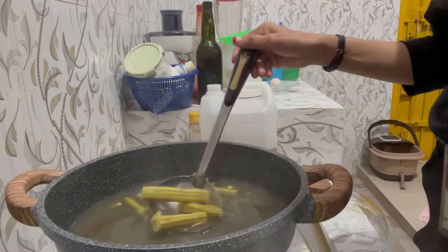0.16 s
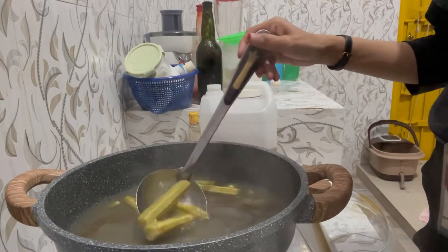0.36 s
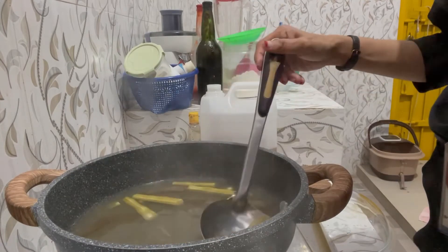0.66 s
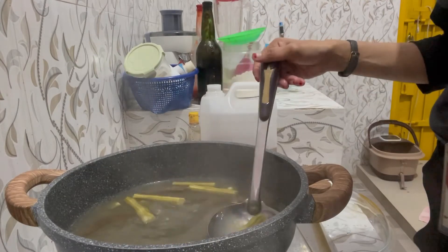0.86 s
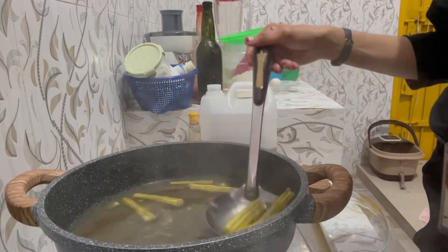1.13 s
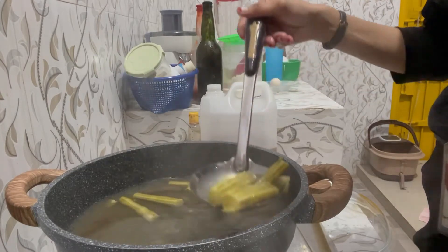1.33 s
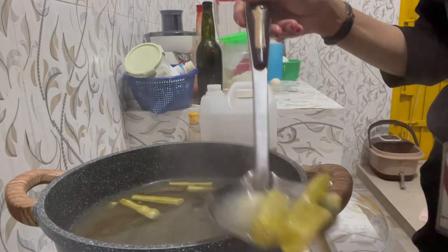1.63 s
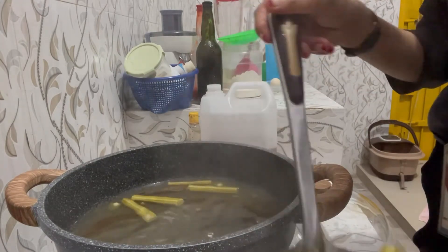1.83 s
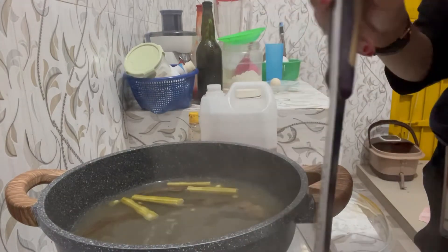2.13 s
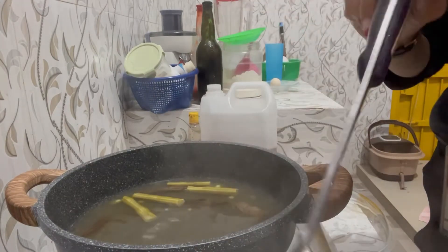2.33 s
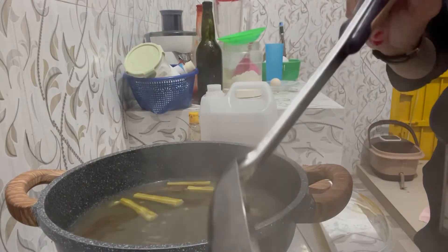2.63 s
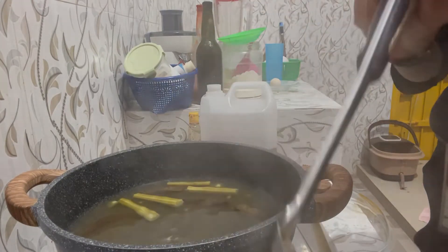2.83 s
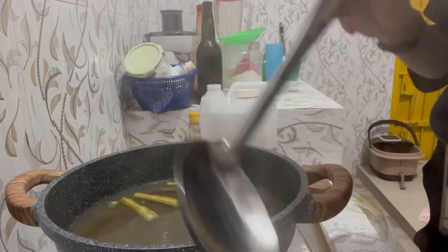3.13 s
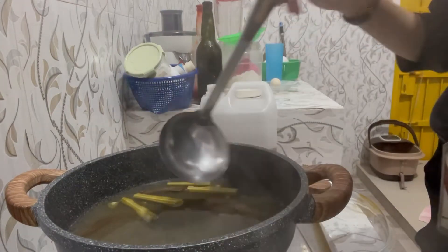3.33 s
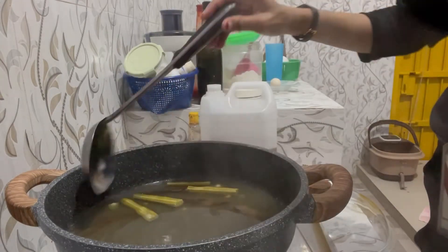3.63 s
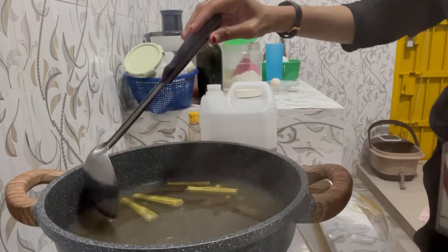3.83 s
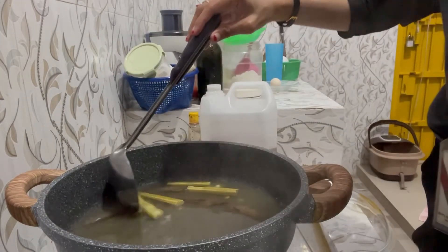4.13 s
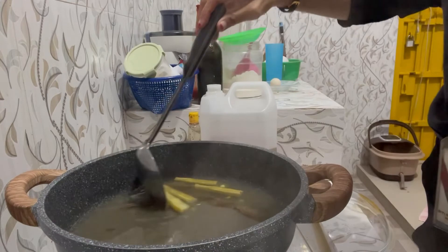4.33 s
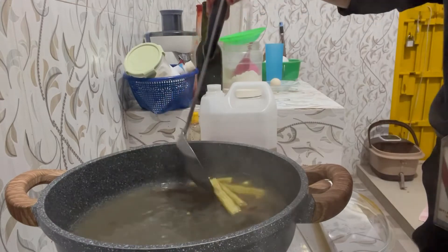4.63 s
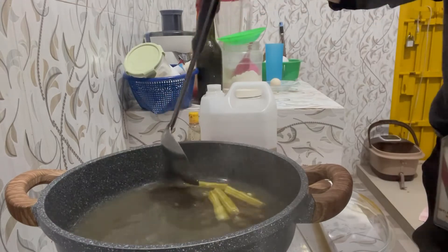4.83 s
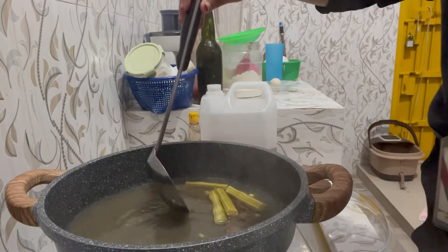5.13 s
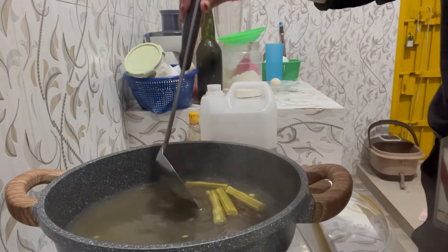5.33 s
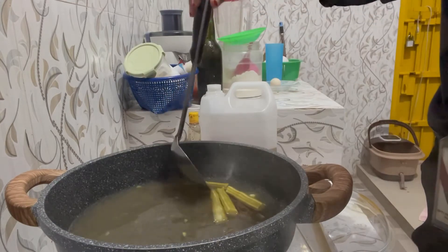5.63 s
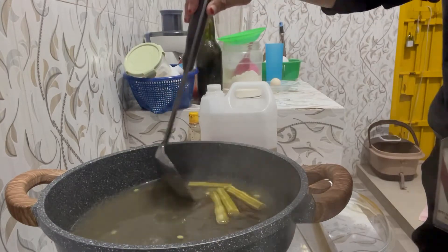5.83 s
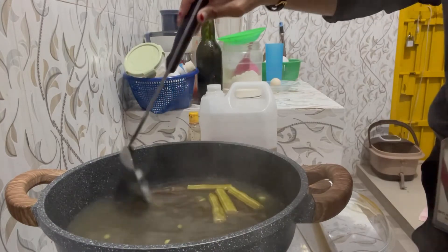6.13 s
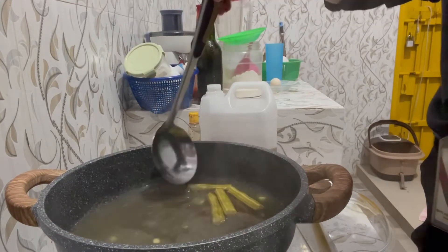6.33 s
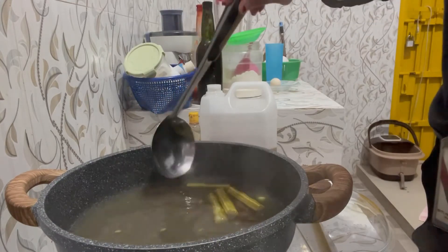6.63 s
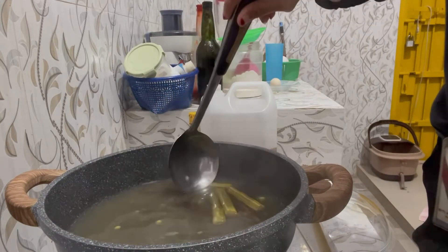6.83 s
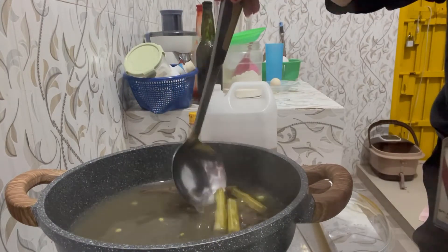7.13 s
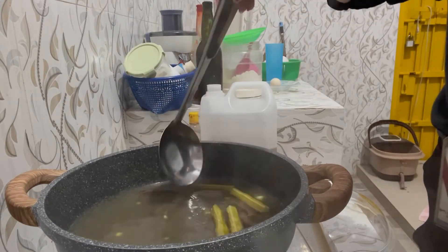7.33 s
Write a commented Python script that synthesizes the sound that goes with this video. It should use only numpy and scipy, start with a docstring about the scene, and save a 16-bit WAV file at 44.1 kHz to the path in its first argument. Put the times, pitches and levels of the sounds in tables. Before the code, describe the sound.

A steel ladle strikes a soup pot at 0.1 and 0.6 seconds, ringing briefly, with light scraping and soft plops. Throughout, a distant one-cylinder motorbike thumps low through the walls over road roar and hiss. A very faint whine rises and falls around 1.5 seconds. From 2 to 2.6 seconds, bits of food tick lightly into a bowl, and a small plop follows near 2.9. The ladle clinks and scrapes again between 3.6 and 4.7 seconds and knocks the pot at 5.2. The bike draws nearer, drops its revs for a gear change at 5.25 seconds, then pulls on, strongest around 7. From 6 to 7 seconds the ladle clatters hardest, with sharp, bright hits, short scrapes and a couple of plops. The kitchen is small, with little echo; the ladle is close, heard in stereo by two spaced microphones.

```python
"""A steel ladle taps and scrapes a soup pot in a small kitchen and the soup plops, while the exhaust
of a distant one-cylinder motorbike thumps through the walls over road roar and hiss. A faint whine
passes at 1.5 s, then bits of food tick into a bowl. The bike draws nearer, changes gear at 5.25 s
and pulls on, and from 6 s the ladle clatters hardest, each blow ringing the steel and the pot.
Two spaced microphones hear it all: bass alike on both, treble unrelated."""
import sys
import numpy as np
from scipy import signal
from scipy.io import wavfile
from scipy.ndimage import uniform_filter1d

SR = 44100
rng = np.random.default_rng(int(sys.argv[2]) if len(sys.argv) > 2 else 0)


def generate_wav(signal):
    """Clip the signal to [-1, 1] and save it as 16-bit WAV at the path in sys.argv[1]."""
    frames = np.transpose(np.atleast_2d(signal))
    scaled = np.clip(frames, -1, 1) * 32767
    pcm = np.round(scaled).astype(np.int16)
    wavfile.write(sys.argv[1], SR, pcm)


N = 329427

# Ladle hits on the pot. Each row: start in seconds, ring level in dB, favoured pitch in Hz, fall-off
# in dB per octave, two pitches that sing out in Hz, ring time as a multiple of the free ring, crack
# and pot hum in dB against the ring, delay at the right microphone in ms.
LADLE_TAPS = [(0.1025, -25.5, 2070, 8.4, 2800, 3820, 1, -1, -2.5, 0.26),
              (0.572, -41.5, 2100, 11, 2080, 2080, 0.74, 4, -6, -0.57),
              (.606, -27, 2980, 2.8, 7900, 1240, .6, -1.5, -12, 0.28),
              (.641, -42, 5200, 17, 5100, 5100, 0.92, -14, -21, 0.37),
              (0.821, -46, 5200, 7, 5960, 5960, 0.66, -2, -15, .3),
              (2, -42.5, 5650, 29, 5650, 5650, 1, -12, -40, .3),
              (3.646, -44.5, 2040, 14, 2400, 2400, 1, 2, -29, 0.35),
              (3.912, -35, 2000, 5, 2800, 2800, 1.1, -1, -29, -0.63),
              (4.221, -33.5, 5900, 10, 1240, 1240, 1.3, -20, -32, .3),
              (4.24, -47, 5900, 9, 5960, 5960, 0.91, -11, -23, 0.32),
              (4.3892, -31, 1350, 20, 1240, 1320, 1.2, -5, -28, -0.66),
              (4.3977, -30, 1350, 18, 1240, 1500, 1, -1, -25, -0.53),
              (4.42, -32, 1700, 14, 1860, 1500, 1.1, -12, -31, -.6),
              (5.211, -26.5, 2060, 9.7, 1320, 2790, 1.5, -11.5, -4, -0.56),
              (5.998, -13.5, 6000, 1.7, 5960, 6420, 0.81, -18, -25, .32),
              (6.002, -17, 4400, 10, 4260, 1320, 1.4, -26, -21, .32),
              (6.294, -13.5, 6440, 1.5, 5650, 5120, 0.63, -20, -34, -0.0036),
              (6.318, -21.5, 3000, 2.3, 5650, 4240, 0.78, -13, -14, -0.011),
              (6.424, -30, 3500, 2.4, 5100, 2400, 0.79, -6, -6.5, -0.077),
              (6.6936, -38, 3800, 12, 3820, 3820, 0.96, -10, -19, -0.07),
              (6.7182, -29, 4500, 3.3, 5650, 2400, 0.88, -9, -22, -0.07),
              (6.7265, -27, 2200, 3.2, 2080, 3220, 1.2, -13, -22, -0.07),
              (6.734, -28, 4500, 8, 5960, 3220, 1.9, -14, -27, -.07),
              (6.759, -36, 2600, 10, 2400, 3220, 1.7, -14, -25, -.07),
              (6.824, -27.5, 6800, 4.5, 4460, 6420, 0.62, -6, -27, -0.053),
              (6.953, -22, 1600, 2.4, 1240, 11580, 0.85, 0.5, -29, 0.14)]
# The voices of ladle and pot. Each row: mode pitch in Hz, level in dB, seconds to fade by 60 dB.
LADLE_MODES = [(1240, -2, .035), (1320, -6, .04), (1500, -3, .035), (1860, -3, .035), (2080, -2, .035),
               (2430, -4, .03), (2790, -8, .025), (3200, -8, .03), (3820, -4, .025), (4260, -6, .04),
               (4460, -7, .035), (5120, -4, .02), (5650, -5, .02), (5960, -5, .045), (6420, -4, .022),
               (7250, -8, .018), (8050, -8, .018), (8550, -11, .015), (10700, -10, .02), (11580, -7, .025),
               (13500, -12, .012), (15300, -13, .02)]
POT_MODES = [(260, -4, .2), (405, -1, .18), (610, -11, .1), (805, -3.5, .28), (880, -8, .25), (950, -9, .1),
             (1100, -9, .06), (1220, -8, .1), (1400, -6, .06), (1860, -15, .12)]
# Drags of the ladle's edge. Each row: start and length in seconds, level in dB, favoured pitch in Hz,
# fall-off in dB per octave, pitch that sings out in Hz, slips per second, treble rasp in dB against
# the ring, delay at the right microphone in ms.
LADLE_SCRAPES = [(0.354, 0.28, -64.5, 4000, -1, 5960, 3400, -24, 0.35),
                 (0.502, 0.16, -53.5, 2180, 1, 1900, 2100, -18, 0.14),
                 (0.654, 0.13, -63, 2000, 7, 2080, 2500, -23, .3),
                 (4.376, 0.08, -39.5, 1430, 6.5, 1860, 1700, -15.5, -0.61),
                 (4.499, 0.21, -51.5, 1700, 26, 1500, 1450, -23, -0.47),
                 (6.014, 0.069, -57, 5000, 16, 5960, 2400, -22, 0.28),
                 (6.324, 0.077, -52, 4630, 0, 5960, 2100, -18, -.04),
                 (6.638, 0.026, -52.5, 5800, 19, 5960, 2100, -15, -0.067),
                 (6.709, 0.067, -42.5, 2600, -2.5, 2380, 1070, -26, -0.073)]
# Soft hits on the soup. Each row: start in seconds, level in dB, pitch in Hz, seconds to fade by 60 dB.
SOUP_PLOPS = [(0.608, -26, 230, 0.13), (.62, -41, 293, 0.74), (0.636, -36, 388, 0.22),
              (0.702, -42, 332.5, 0.53), (2.901, -43, 271, 0.29), (6.005, -34.5, 261.5, 0.97),
              (6.302, -43, 259, 0.4)]
# Food and drops landing in the bowl. Each row: start in seconds, level in dB, centre pitch in Hz.
FOOD_TICKS = [(.0095, -38, 8000), (1.079, -48, 3830), (1.962, -45, 8000), (2.032, -44.5, 9000),
              (2.04, -49, 4350), (2.074, -35, 10700), (2.137, -45, 3660), (2.177, -37.5, 6500),
              (2.325, -42.5, 6470), (2.331, -56, 11000), (2.356, -49, 11000), (2.371, -46, 1500),
              (2.5476, -46, 3800), (2.579, -54, 6460), (2.6194, -59, 3500), (3.3844, -47, 3670),
              (4.44, -40, 13000)]
# The engine's revs. Each row: time in seconds, firings per second.
FIRING_RATE = [(0, 22.2), (.62, 23.4), (1.14, 24.2), (2.25, 25.35), (3.22, 25.8), (4, 26.1), (4.49, 26.3),
               (4.89, 26.1), (5.26, 26.15), (5.4, 21.3), (5.5, 21.7), (5.8, 23.75), (5.95, 24.2),
               (6.55, 24.27), (6.95, 24.2), (7.26, 24.07), (7.47, 23.6)]
# The body of the exhaust. Each row: time in seconds, level in dB, pitch the path favours in Hz.
THUMP = [(0, -38.5, 138), (.25, -30, 108), (.56, -36.5, 181), (1.12, -38, 147), (1.5, -39.5, 134),
         (1.85, -31.5, 129.4), (2.43, -28, 119.5), (2.62, -31, 123), (2.85, -29, 125), (3.15, -31.5, 129),
         (3.4, -28.5, 136.5), (3.74, -31, 144), (3.93, -35.5, 132), (4.25, -26.5, 152),
         (4.49, -30.5, 165.6), (4.68, -27.5, 151), (5.1, -26, 179.5), (5.26, -27, 158), (5.36, -32.5, 121),
         (5.61, -27.5, 171.4), (5.82, -29.5, 134), (6.05, -30, 155), (6.4, -24.5, 168), (6.75, -25, 165.6),
         (7.1, -21.5, 134), (7.47, -29.5, 150)]
# The bike's approach. Each row: time in seconds, level in dB against roughly its nearest point.
NEARNESS = [(0, -12), (1.2, -12.5), (2.6, -11.5), (3.33, -8.5), (4.2, -6), (4.6, -5.5), (5.1, -3.5),
            (5.26, -7.5), (5.49, -9.5), (5.65, -5.5), (6.14, -2.5), (6.7, 0.5), (6.95, -1), (7.32, -1.5),
            (7.47, -5)]
# Two paths cancel at a pitch that sweeps as the bike moves. Each row: time in seconds, notch pitch
# in Hz, gain there in dB (a lift if positive), half width of the thump's favoured band in Hz.
PATH_NOTCH = [(0, 140, 0, 32), (1.5, 141, 1.5, 31), (2.3, 166, -4, 26.8), (2.58, 157, -13, 30),
              (2.72, 130, -9, 41.4), (3.12, 139.3, -28, 41.4), (3.3, 106.5, -16, 36), (3.6, 120, -13.5, 29),
              (3.9, 146, -9, 39.8), (4.0, 150, 3, 40), (4.08, 124, -15, 42.5), (4.36, 144, -13, 47.7),
              (4.42, 111, 2, 45), (4.5, 104, -21, 39.5), (4.8, 143, -44, 43.6), (4.95, 151, -46, 33.6),
              (5.04, 152, -6, 39.3), (5.12, 128, 7.5, 38.4), (5.3, 136, 4.5, 35.5), (5.55, 156, -8, 45),
              (5.7, 156, -2, 44.7), (5.86, 141, -40, 39.5), (6.02, 146, -25, 45.5), (6.15, 112, -11, 40.7),
              (6.5, 113, -4, 38), (6.62, 142, -7, 39.5), (6.76, 193, -17, 41.3), (6.92, 183, -35, 33.5),
              (7.05, 195, 7, 31.3), (7.47, 194, -0.5, 32.3)]
# EQ for the exhaust's deep and rasping harmonics. Each row: frequency in Hz, gain in dB.
DEEP_AND_RASP_EQ = [(20, -29), (48, 2.5), (75, -11.5), (245, -7.5), (305, -10), (410, -4.5), (465, -19),
                    (497, -11), (525, -19.5), (560, 4.5)]
# A moving accent in the exhaust's rasp. Each row: time in seconds, pitch in Hz, lift in dB.
RASP_ACCENT = [(0, 395, -1), (2.1, 434, 3.5), (2.3, 312, 7.5), (3.2, 302, 16.5), (3.5, 306, 1.5),
               (3.75, 308, 16), (4.05, 317, 5), (4.3, 400, -19), (4.7, 412, 7.5), (5.3, 406, 2.5),
               (5.75, 397, 6), (6.0, 398, 11), (6.35, 383, 12), (6.6, 415, 14.5), (6.84, 392, -5.5),
               (6.94, 380, 15), (7.04, 378, 14.5), (7.11, 375, -2), (7.2, 368, 8), (7.47, 369.6, 18.5)]
# The tone of the road roar and of the hiss. Each row: frequency in Hz, gain in dB.
ROAR_EQ = [(28, -47), (50, 28), (110, 18.5), (200, 7.5), (260, 6.5), (420, 7.5), (650, 2.5), (930, 1.5),
           (1250, -3), (1520, -9), (1800, -6.5), (2300, -12), (3000, -14), (3900, -15.5), (5000, -23.5),
           (9000, -48)]
HISS_EQ = [(1000, -10), (3000, -3), (6000, 8.5), (8000, 3.5), (9300, -10.5), (11000, 3), (13000, -5.5),
           (13700, -9), (16000, -55)]
# Resonances that colour the roar indoors. Each row: centre in Hz, half width in Hz, mean lift in dB.
INDOOR_RESONANCES = [(912, 52, 8), (1533, 91, 7.5), (1956, 13, -2), (2246, 225, 5), (3830, 150, 4)]
# The hiss jumps up and dies away. Each row: start in seconds, rise in dB.
HISS_SWELLS = [(.45, 6), (2.1, 5), (2.8, 8)]
# Stereo width of the street. Each row: frequency in Hz, left-right likeness from 0 to 1.
STEREO_LIKENESS = [(60, 0.97), (150, 1), (290, 0.076), (600, 0.0093), (3000, 0.017), (15000, 0.012)]
# Panning of the street. Each row: frequency in Hz, left minus right in dB.
STEREO_BALANCE = [(60, -1.5), (180, 3), (550, -2.5), (1650, 0.5), (4970, 0.5), (15000, 0)]
# The whine's rise and fall. Each row: time in seconds, pitch in Hz, level in dB.
WHINE_PATH = [(1.33, 950, -75), (1.42, 965, -55), (1.55, 1015, -54), (1.68, 1035, -58), (1.8, 985, -62),
              (1.95, 950, -62), (2.05, 940, -75)]
# The kitchen's reverb. Each row: frequency in Hz, seconds to fade by 60 dB.
KITCHEN_DECAY = [(250, 0.036), (1500, 0.13), (6000, 0.096), (14000, 0.0034)]

SING_DB, TWIN_SHARE, TWIN_DB = 2, .01, -10  # ladle modes: those that sing out; each one's weaker twin
BOWL_DELAY_MS = .3
ROAR_DB, HISS_DB, DEEP_DB, RASP_DB = -53.5, -80, -37.5, -45.5  # faders ahead of EQ and nearness
DEEP_FOLLOWS, RASP_FOLLOWS = .68, .7  # dB per dB of nearness
# Gear change: the throttle shuts, firing turns uneven, and the deepest harmonics stay away a while.
SHIFT_S, SHUT_S, UNEVEN_S, DEEP_GONE_S, RECOVER_S, DEEP_LOSS_DB = 5.25, .07, .43, 1.0, .2, -25
ROUGH_FAR, ROUGH_PULL, ROUGH_SHIFT, SETTLED_S = .06, .02, .28, 1.6  # roughness runs from 0 to 1
FAR_DB, NEAR_DB, SLIP_FAR, SLIP_NEAR = -5.5, -3, 1.4, .5  # phase steadies as the direct path takes over
WALL_HZ, NOTCH_HALF_WIDTH_HZ, ACCENT_HALF_WIDTH_HZ = 227.2, 9.9, 24


def ladle_taps():
    """Steel strikes the pot: a short crack, the ladle's ring and the soup-damped hum of the pot."""
    out, t = np.zeros((2, N)), np.arange(SR // 3) / SR
    for start, db, hz, fall_db, sing_hz, also_hz, lasting, crack_db, pot_db, delay_ms in LADLE_TAPS:
        contact = 1 - np.exp(-t / .0009)  # the curved edge beds in over a millisecond or two
        metal = ladle_ring(hz, fall_db, (sing_hz, also_hz), lasting, t) * contact
        noise = rng.standard_normal(len(t))
        crack = unit_rms(steep_band(noise, hz, 1.4 * hz)) + gain_of(-2.5 * max(fall_db, 0)) * noise
        crack *= gain_of(-60 * t / .016) * contact
        hum = ring(POT_MODES, t, spread_db=1.5, detune=.006) * (1 - np.exp(-t / .006))
        hit = metal / abs(metal).max() + gain_of(crack_db) * crack + gain_of(pot_db) * hum
        place(out, start, gain_of(db) * hit, delay_ms)
    return out


def ladle_scrapes():
    """Uneven slips of the dragging edge keep the ladle ringing, with grit and a bright rasp on top."""
    out, ring_t = np.zeros((2, N)), np.arange(1500) / SR
    for start, length, db, hz, fall_db, sing_hz, per_s, treble_db, delay_ms in LADLE_SCRAPES:
        t = np.arange(int(length * SR)) / SR
        chance, size, sign = rng.random((3, SR // 2))[:, :len(t)]
        noise = size - .5
        slips = (chance < per_s / SR) * gain_of(-3 * np.log(size + 1e-4)) * np.sign(sign - .5)
        slips += .1 * noise
        steel = ladle_ring(hz, fall_db, [sing_hz], lasting=.83, t=ring_t)
        metal = signal.fftconvolve(slips[None], steel, axes=1)[:, :len(t)]
        grit = per_s / 3500 * unit_rms(steep_band(slips, hz, hz))  # denser slips sound grittier
        rasp = gain_of(treble_db) * unit_rms(steep_band(noise, 11500, 4500))
        level = gain_of(db + 2.5 * drift(t, 70.)[0])
        ease = signal.windows.tukey(len(t), min(3 * length, 1))
        place(out, start, level * (unit_rms(metal) + grit + rasp) * ease, delay_ms)
    return out


def ladle_ring(hz, fall_db, sing_hz, lasting, t):
    """The steel rings around the pitch the contact favours, and the modes nearest sing_hz sing out."""
    singers = [min(LADLE_MODES, key=lambda mode: abs(mode[0] - pitch))[0] for pitch in sing_hz]
    modes = [(f, SING_DB if f in singers else db - fall_db * abs(np.log2(f / hz)), t60 * lasting)
             for f, db, t60 in LADLE_MODES]
    # The ladle's cup is not quite round, so each mode has a slightly sharp twin.
    modes += [(f * (1 + TWIN_SHARE), db + TWIN_DB, t60) for f, db, t60 in modes]
    sound = ring(modes, t, spread_db=1.3, detune=.003)
    return sound / abs(sound).max()


def ring(modes, t, spread_db, detune):
    """Dying modes in stereo; each blow lands elsewhere and wakes them unevenly and out of step."""
    out, sides = np.zeros((2, len(t))), np.array([[.5], [-.5]])
    for hz, db, t60 in modes:
        strength, tuning, offset, sideways = rng.standard_normal(4)
        phase = 2 * np.pi * hz * (1 + detune * tuning) * t + 2 * offset
        phase = phase + .7 * sideways * sides  # each mode radiates its own way
        out += gain_of(db + spread_db * strength - 60 * t / t60) * np.sin(phase)
    return out


def soup_plops():
    """Ladle or food thumps the soup: a low, soft-edged note whose pitch rises a little."""
    out, t = np.zeros((2, N)), np.arange(SR // 3) / SR
    for start, db, hz, t60 in SOUP_PLOPS:
        slosh = unit_rms(band(rng.standard_normal(len(t)), hz, .5 * hz))
        tone = np.sin(2 * np.pi * hz * (t + .11 * t ** 2))
        envelope = gain_of(db - 60 * t / t60) * (1 - np.exp(-t / .005))
        place(out, start, envelope * (tone + .57 * slosh), BOWL_DELAY_MS)
    return out


def food_ticks():
    """Bits of food and drops land in the bowl with tiny bright clicks."""
    out, t = np.zeros((2, N)), np.arange(600) / SR
    for start, db, hz in FOOD_TICKS:
        click = unit_rms(band(rng.standard_normal(len(t)), hz, .7 * hz))
        place(out, start, gain_of(db - 60 * t / .0054) * click, BOWL_DELAY_MS)
    return out


def kitchen_reverb(x):
    """Sparse wall reflections, different on each side, with every band dying at its own speed."""
    echoes = np.zeros((2, SR // 2))
    at = np.arange(60, SR // 2 - 20, 20)
    at = at + rng.integers(0, 20, (2, len(at)))
    np.put_along_axis(echoes, at, rng.choice([-1., 1.], at.shape), 1)
    hz, t, spectra = signal.stft(echoes, SR, nperseg=256)
    decay = gain_of(-60 * t / at_pitch(KITCHEN_DECAY, hz)[:, None])
    tail = signal.istft(spectra * decay, SR, nperseg=256)[1]
    return signal.fftconvolve(x[None], tail / np.linalg.norm(tail[0]), axes=1)[:, :N]


def motorbike_exhaust(count=21):
    """Harmonics of the firing rate, each fading and slipping in phase as its path to the room moves."""
    step = 16  # all low end, so it is built at a reduced sample rate
    t = np.arange(N // step + 2) * step / SR
    thump_db, favoured_hz = curves(THUMP, t)
    rate, near_db = curves(FIRING_RATE, t)[0], curves(NEARNESS, t)[0]
    firings = np.cumsum(rate * (1 + .002 * drift(t, 6.)[0])) * step / SR
    order = np.arange(1, count + 1)[:, None]
    hz = order * rate
    is_thump = (order > 3) & (order < 10)  # the deep end lies below, the rasp above
    outer_db = deep_and_rasp_db(t, order, hz, near_db) - thump_db
    shape = np.where(is_thump, path_through_walls(t, hz, favoured_hz), gain_of(outer_db))

    rough = ROUGH_PULL + (ROUGH_FAR - ROUGH_PULL) * (t < SETTLED_S)
    rough += (ROUGH_SHIFT - ROUGH_PULL) * gear_change(t, UNEVEN_S)
    fade, slip, apart, shake = (drift(t, top_hz, count) for top_hz in (2., .7, 1.2, 20.))
    loose = np.clip(hz / 300, .2, 1.1)  # short waves feel the path more
    size = shape * gain_of(np.where(is_thump, 1.2, 2 + loose) * fade)
    size /= np.where(is_thump, np.sqrt((size ** 2 * is_thump).sum(0)), 1)  # hold the thump's power
    size *= 1 + 1.5 * rough * shake

    slide = np.interp(near_db, [FAR_DB, NEAR_DB], [SLIP_FAR, SLIP_NEAR])
    wander = np.where(is_thump, slide, 1.5) * np.sqrt(loose) * slip + .6 * slip[0]
    jitter = (1 + 3 * loose) * rough * shake[::-1]
    phase = 2 * np.pi * order * firings + wander + jitter
    width = np.arccos(at_pitch(STEREO_LIKENESS, hz)) * apart / 2
    pan = gain_of(at_pitch(STEREO_BALANCE, hz) / 2)
    pair = np.array([(size * pan ** side * np.cos(phase + side * width)).sum(0) for side in (1, -1)])
    return signal.resample_poly(np.sqrt(2) * gain_of(thump_db) * pair, step, 1, axis=1)[:, :N]


def path_through_walls(t, hz, favoured_hz):
    """The thump's way indoors favours one pitch, notches another and loses its top to the walls."""
    notch_hz, notch_db, half_width = curves(PATH_NOTCH, t)
    favoured = bell(hz, favoured_hz, half_width) + .24
    notch = gain_of(notch_db * bell(hz, notch_hz, NOTCH_HALF_WIDTH_HZ))
    return favoured * notch / (1 + (hz / WALL_HZ) ** 36)


def deep_and_rasp_db(t, order, hz, near_db):
    """The exhaust's deep end and rasp grow as it nears; the deep end ducks at the gear change."""
    deep_db = DEEP_DB + DEEP_FOLLOWS * near_db + DEEP_LOSS_DB * gear_change(t, DEEP_GONE_S)
    accent_hz, lift_db = curves(RASP_ACCENT, t)
    rasp_db = RASP_DB + RASP_FOLLOWS * near_db + lift_db * bell(hz, accent_hz, ACCENT_HALF_WIDTH_HZ)
    return np.where(order < 4, deep_db, rasp_db) + at_pitch(DEEP_AND_RASP_EQ, hz)


def gear_change(t, hold_s):
    """An envelope that rises to 1 as the throttle shuts, holds and falls back."""
    return np.interp(t, np.cumsum([SHIFT_S, SHUT_S, hold_s, RECOVER_S]), [0, 1, 1, 0])


def road_noise():
    """A bed of road roar, puffing a little with each firing, and hiss; both grow as the bike nears."""
    hop = 256
    t, hz = np.arange(N // hop + 5) * hop / SR, np.fft.rfftfreq(1024, 1 / SR)[:, None]
    left_re, left_im, other_re, other_im, patches = rng.standard_normal((len(t), len(hz), 5)).T
    patches = unit_rms(uniform_filter1d(uniform_filter1d(patches, 8, 0), 16, 1))
    near_db = curves(NEARNESS, t)[0]
    swell_db = sum(db * (t > start) * np.exp(-abs(t - start) / .16) for start, db in HISS_SWELLS)
    hiss = gain_of(HISS_DB + at_pitch(HISS_EQ, hz) + near_db + swell_db)
    puff_db = .5 * np.cos(2 * np.pi * np.cumsum(curves(FIRING_RATE, t)[0]) * hop / SR)
    wavers = 1 + .22 * drift(t, 4., len(INDOOR_RESONANCES))
    indoor_db = sum(db * bell(hz, centre, half_width) * waver
                    for (centre, half_width, db), waver in zip(INDOOR_RESONANCES, wavers))
    roar = gain_of(ROAR_DB + at_pitch(ROAR_EQ, hz) + indoor_db + near_db + puff_db)
    likeness, pan = at_pitch(STEREO_LIKENESS, hz), gain_of(at_pitch(STEREO_BALANCE, hz) / 2)
    left = left_re + 1j * left_im
    right = likeness * left + np.sqrt(1 - likeness ** 2) * (other_re + 1j * other_im)
    spectra = np.array([left * pan, right / pan]) * np.hypot(roar, hiss) * gain_of(1.2 * patches)
    return signal.istft(spectra, nperseg=1024, noverlap=1024 - hop)[1][:, :N]


def faint_whine():
    """A thin, slightly unsteady tone that rises and falls."""
    hz, db = curves(WHINE_PATH, np.arange(N) / SR)
    wobble = unit_rms(uniform_filter1d(uniform_filter1d(rng.standard_normal((2, N)), 500), 500))
    tone = np.sqrt(2) * np.cos(2 * np.pi * np.cumsum(hz) / SR + wobble[::-1])
    return gain_of(db + 2 * wobble) * tone * (db > -75)


def place(pair, start, sound, delay_ms):
    """Close sounds reach the right microphone a little louder and at their own moment."""
    first = round(start * SR)
    starts = first, round(first + delay_ms * SR / 1000)
    for track, at, side in zip(pair, starts, sound * gain_of([[-.8], [.8]])):
        part = track[at:][:len(side)]
        part += side[:len(part)]


def drift(t, top_hz, count=1):
    """Random wobbles of rms 1, one per row, moving at rates up to top_hz."""
    hz = np.geomspace(top_hz / 10, top_hz, 12)[:, None]
    return np.array([unit_rms(np.sin(2 * np.pi * (hz * t + offsets[:, None])).sum(0))
                     for offsets in rng.random((count, 12))])


def band(x, hz, width):
    """One broad resonance."""
    return signal.lfilter(*signal.iirpeak(hz, hz / width, SR), x)


def steep_band(x, hz, width):
    return band(band(x, hz, width), hz, width)


def bell(hz, centre, half_width):
    return np.exp(-((hz - centre) / half_width) ** 2)


def curves(rows, t):
    """One automation curve for each column after the time."""
    times, *columns = np.transpose(rows)
    return [np.interp(t, times, column) for column in columns]


def at_pitch(points, hz):
    """A table's value at hz, along a log frequency axis."""
    pitches, values = np.transpose(points)
    return np.interp(np.log(hz + 1), np.log(pitches + 1), values)


def gain_of(db):
    return 10 ** (np.asarray(db) / 20)


def unit_rms(x):
    return x / np.sqrt(np.mean(x ** 2) + 1e-20)


def scene():
    """Close kitchen sounds with their reverb, over the bike, the road and the whine."""
    close = ladle_taps() + ladle_scrapes() + food_ticks() + soup_plops()
    room = gain_of(-6) * kitchen_reverb(close.mean(0))
    return close + room + motorbike_exhaust() + road_noise() + faint_whine()


def record(dry):
    """A low cut at 32 Hz and a steep high cut at 16.1 kHz."""
    low_cut = signal.sosfilt(signal.butter(2, 32., "high", fs=SR, output="sos"), dry)
    high_cut = signal.firwin(511, 16100, window=("kaiser", 9), fs=SR)
    return signal.oaconvolve(low_cut, high_cut[None], "same")


dry = scene()
out = record(dry)
generate_wav(out)
```